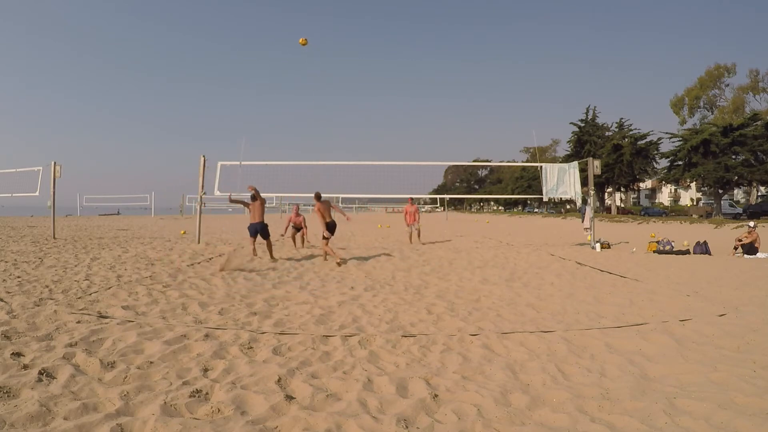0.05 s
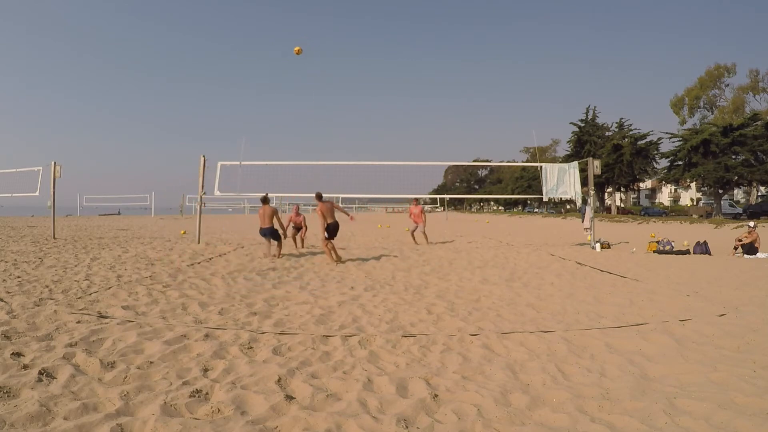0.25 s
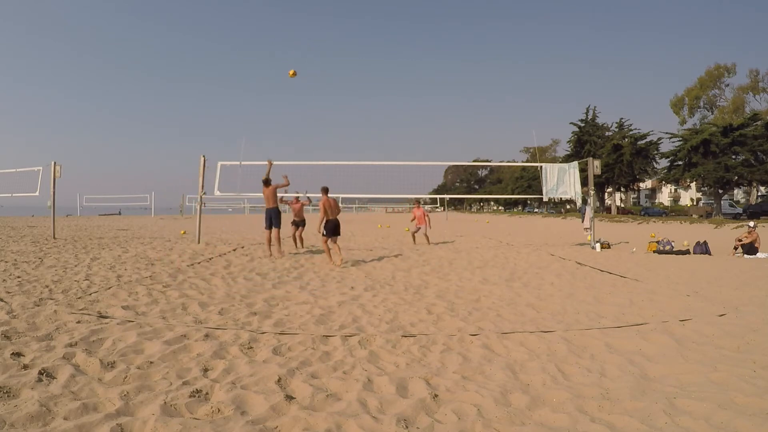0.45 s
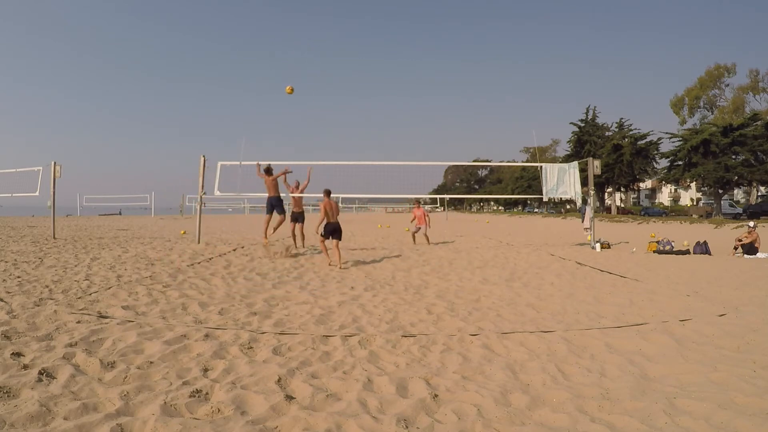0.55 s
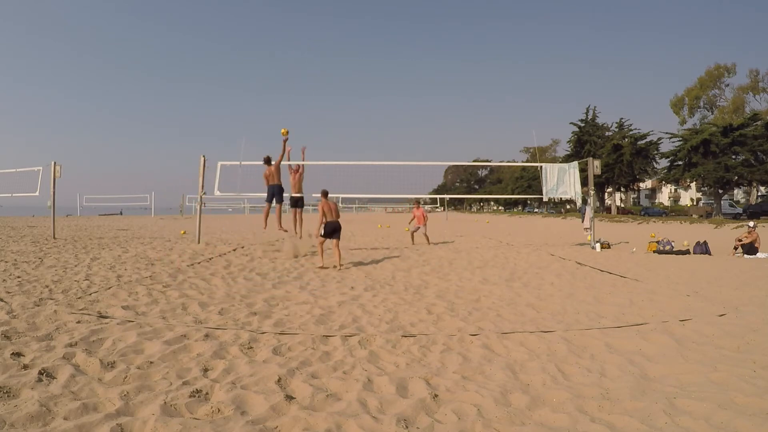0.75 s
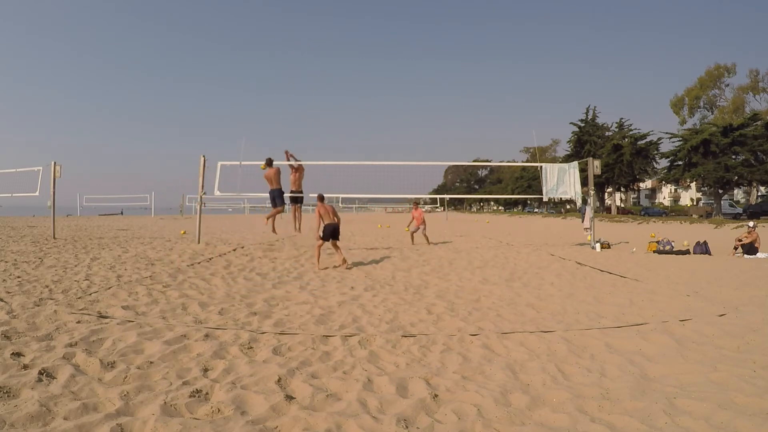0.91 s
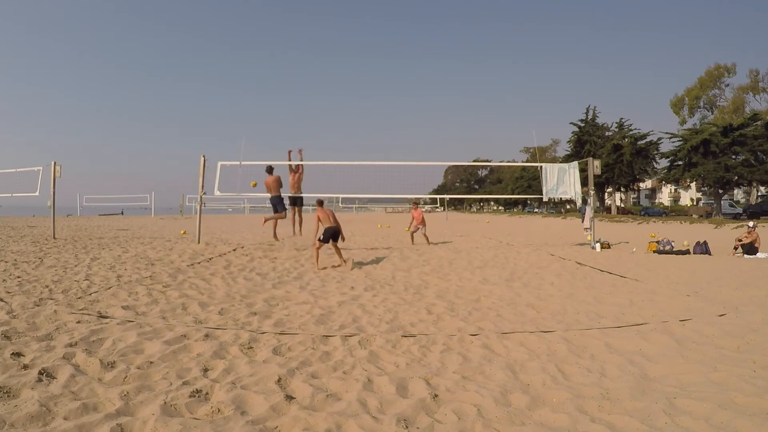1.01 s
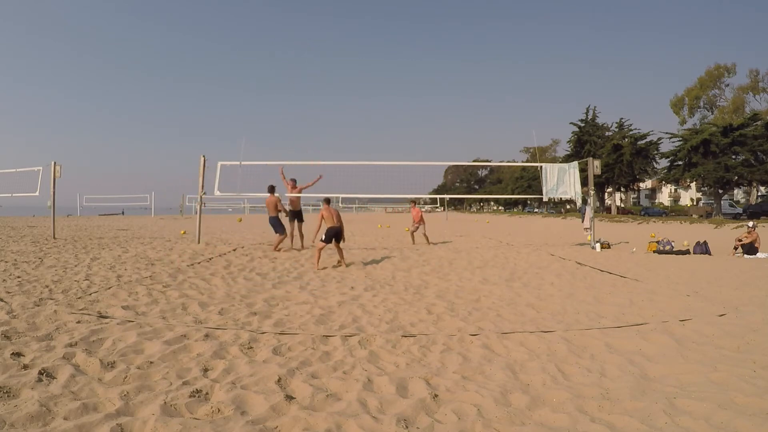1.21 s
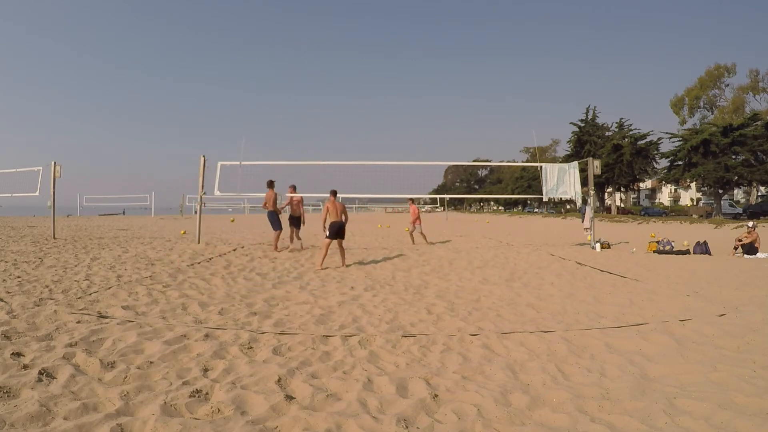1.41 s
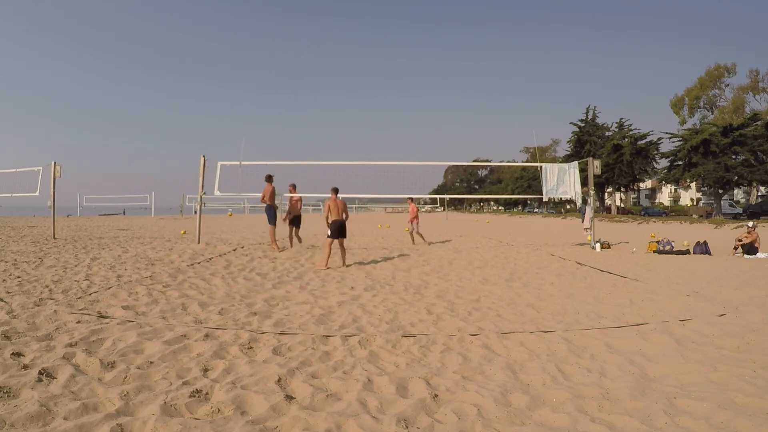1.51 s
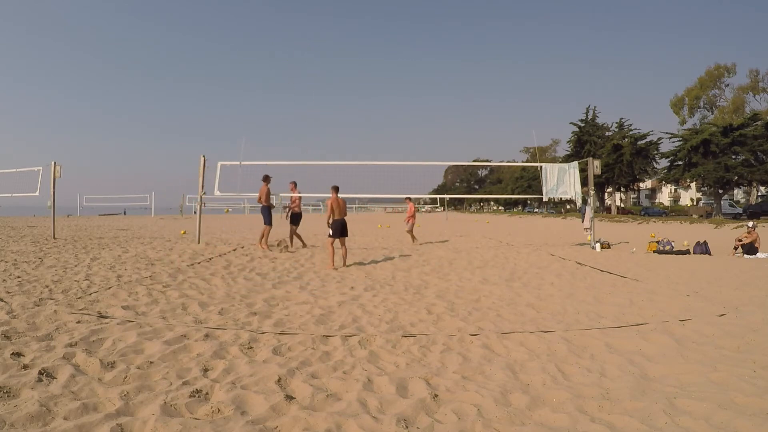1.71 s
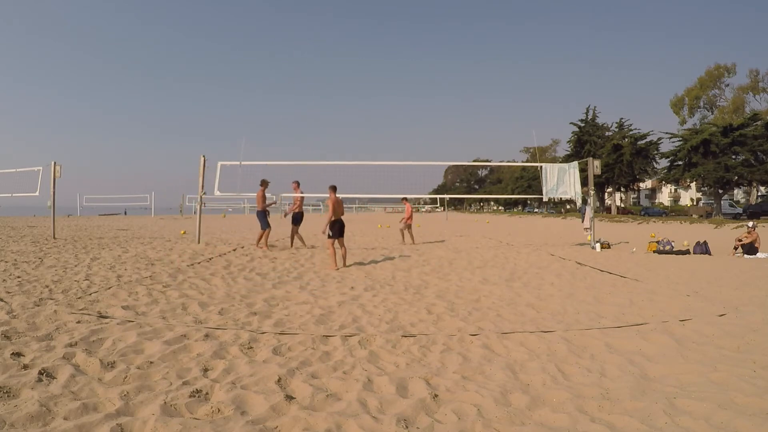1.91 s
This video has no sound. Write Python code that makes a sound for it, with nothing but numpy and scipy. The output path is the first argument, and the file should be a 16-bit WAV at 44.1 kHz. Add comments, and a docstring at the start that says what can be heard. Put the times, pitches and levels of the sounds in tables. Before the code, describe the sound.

A hand strikes a volleyball once at about 0.9 seconds, a sharp slap with a low thump and a very short tail. Wind buffets the microphone with a low, wavering rumble from 0.2 to 0.5 seconds and again from 1.3 to 1.7. Distant surf hisses faintly throughout. Soft steps in sand come before the hit and around 1.3 seconds, with faint, far chirps scattered behind.

```python
"""A breeze rumbles over distant surf, soft steps in the sand and faint chirps: beach volleyball.
Two gusts buffet the microphone with a low, wavering drone. Between them comes one sharp slap:
fingers and palm strike the ball, squeezing out a crack of air and exciting the modes of its skin.
The ball thumps, the air inside rings briefly, and sand and players scatter the sound."""
import sys
import numpy as np
from scipy import signal
from scipy.fft import rfft, irfft
from scipy.io import wavfile
from scipy.ndimage import uniform_filter1d

SR = 44100
rng = np.random.default_rng(int(sys.argv[2]) if len(sys.argv) > 2 else 0)


def log_audio(samples):
    """Write samples as a 16-bit WAV file to the path given in sys.argv[1]."""
    # one column per channel
    frames = np.atleast_2d(samples).T
    # limit to full scale, then quantise
    limited = np.clip(frames, -1, 1)
    pcm = np.round(limited * 32767).astype(np.int16)
    wavfile.write(sys.argv[1], SR, pcm)


N = 85995
T = np.arange(N) / SR
HIT_S = .8991


def from_db(db):
    """Amplitude grows tenfold for every 20 dB."""
    return 10 ** (np.asarray(db) / 20)


def rms_one(x):
    """Division by the rms gives a signal unit power."""
    return x / np.sqrt(np.mean(x ** 2) + 1e-20)


def in_time(rows):
    """Linear interpolation joins (seconds, value) points into a curve."""
    return np.interp(T, *np.transpose(rows))


def noise(spectrum):
    """Spectral shaping turns white noise into coloured noise of unit rms."""
    hz, db = np.transpose(spectrum)
    bins = np.maximum(np.fft.rfftfreq(N, 1 / SR), 1)
    gain = from_db(np.interp(np.log(bins), np.log(hz), db)) * np.minimum(bins / 20, 1) ** 2
    return rms_one(irfft(rfft(rng.standard_normal(N)) * gain, N))


def drift(rate_hz):
    """Low-pass filtered noise wanders about zero with unit spread."""
    bins = np.fft.rfftfreq(N, 1 / SR)
    gain = (bins > 0) / (1 + (bins / rate_hz) ** 2) ** 2
    return rms_one(irfft(rfft(rng.standard_normal(N)) * gain, N))


def swells(rows):
    """Gaussian bumps add up to an envelope; each width is a standard deviation."""
    return sum(from_db(db) * np.exp(-.5 * ((T - at) / width) ** 2) for at, db, width in rows)


def touch(at, length):
    """A force pulse of unit area: the shorter the contact, the wider its spectrum."""
    pulse = np.exp(-2 * ((T - at) / length) ** 2)
    return pulse / (pulse.sum() + 1e-20)


def ring(force, modes):
    """Modal superposition: a force drives damped resonators, neighbours in opposite sign."""
    response = 0
    for k, (hz, db, t60) in enumerate(modes):
        radius = np.exp(-np.log(1000) / (t60 * SR))
        angle = 2 * np.pi * hz / SR
        feedback = [1, -2 * radius * np.cos(angle), radius ** 2]
        mode = signal.lfilter([0, np.sin(angle)], feedback, force + 1e-18)
        response += (-1) ** k * from_db(db) * mode
    return response


def burst(attack_s, hold_s, t60_s):
    """An envelope rises linearly from the hit and decays exponentially after the hold."""
    age = T - HIT_S
    return np.clip(age / attack_s, 0, 1) * np.exp(-np.log(1000) * np.maximum(age - hold_s, 0) / t60_s)


def wind():
    """Pressure fluctuations of gusts at the microphone make a wavering drone and a rumble."""
    # Each row: time in seconds, relative level in dB.
    drone_levels = [(0, -49), (.05, -61), (.17, -67), (.22, -36), (.29, -27.5), (.385, -30), (.42, -38),
                    (.48, -35), (.51, -47), (.67, -54.5), (.8, -45), (.85, -67), (1.02, -58), (1.08, -54),
                    (1.285, -52.5), (1.315, -32.5), (1.36, -59), (1.4, -39.5), (1.435, -41.5), (1.465, -31),
                    (1.51, -45.5), (1.57, -41), (1.595, -54), (1.64, -34.5), (1.75, -52), (1.9, -59),
                    (1.95, -49)]
    rumble_levels = [(0, -47), (.19, -54), (.25, -37.5), (.3, -40.5), (.36, -35.5), (.42, -42),
                     (.52, -49.5), (.66, -53.5), (.85, -62), (1.0, -57), (1.29, -49), (1.32, -36),
                     (1.38, -33.5), (1.43, -42), (1.57, -44), (1.62, -51), (1.8, -68), (1.95, -52)]
    # Each row: frequency in Hz, relative spectral density in dB.
    rumble_spectrum = [(20, -13), (32, -3), (44, 8.5), (58, 4), (75, -8.5), (100, -28), (135, -22),
                       (180, -38), (400, -55), (900, -72), (6000, -115)]
    drone_hz = 81.65 + 1.5 * drift(rate_hz=17.9)
    drone_db = in_time(drone_levels) - 1 - 0.5 * drift(rate_hz=30)
    phase = 2 * np.pi * np.cumsum(drone_hz) / SR
    drone = np.sqrt(2) * np.sin(phase) * from_db(drone_db)
    eddies = noise(rumble_spectrum)
    local_power = uniform_filter1d(np.abs(signal.hilbert(eddies)) ** 2 / 2, size=3000)
    even_eddies = eddies / np.sqrt(local_power + 1e-9)  # the level curve alone shapes the gusts
    return drone + from_db(in_time(rumble_levels)) * even_eddies


def surf():
    """Distant waves add incoherently into steady noise."""
    # Each row: frequency in Hz, relative spectral density in dB.
    surf_spectrum = [(25, 21.5), (40, 23), (60, 17.5), (85, 22), (120, 17.5), (170, 15.5), (240, 5.5),
                     (340, 0.5), (480, 0), (750, -3.5), (1200, -5), (1750, -8), (2400, -8), (3300, -10),
                     (4800, -11), (7000, -15.5), (10000, -18), (14500, -20.5)]
    return from_db(-52) * noise(surf_spectrum)


def footsteps():
    """Sand thuds under compression and hisses with friction as feet sink and scuff."""
    # Each row: peak time in seconds, level in dB, width in seconds.
    steps = [(.02, -63, .03), (.2, -63, 0.054), (.368, -57.5, 0.018), (.55, -71, 0.036),
             (1.32, -62.5, 0.022)]
    scuffs = [(1.053, -74, .04), (1.345, -68, 0.032)]
    # Each row: frequency in Hz, relative spectral density in dB.
    step_spectrum = [(100, 6.5), (190, 2.5), (300, -1.5), (500, 5), (800, -8.5), (1400, -8.5), (2500, -26),
                     (5000, -37), (10000, -53)]
    scuff_spectrum = [(300, 0), (1000, -22), (2200, -10), (3400, -2), (4400, 1), (8000, -17), (15000, -30)]
    return swells(steps) * noise(step_spectrum) + swells(scuffs) * noise(scuff_spectrum)


def chirps(bandwidth_hz=420):
    """Narrow-band noise has a breathy pitch; short swells of it make faint, far chirps."""
    # Each row: peak time in seconds, level in dB, width in seconds, centre frequency in Hz.
    calls = [(0.225, -70.5, 0.059, 2160), (0.383, -69, 0.036, 2250), (.45, -72, 0.051, 2300),
             (1.05, -73, 0.031, 3280), (1.072, -71.5, 0.1, 2110), (1.346, -71.5, 0.1, 2290),
             (1.596, -73.5, .025, 2890), (1.575, -72, .02, 2340), (1.65, -68.5, 0.038, 2270)]
    sound = np.zeros(N)
    for at, db, width, hz in calls:
        edges = [hz - bandwidth_hz / 2, hz + bandwidth_hz / 2]
        band = signal.butter(2, edges, "band", fs=SR, output="sos")
        breath = rms_one(signal.sosfilt(band, rng.standard_normal(N)))
        sound += swells([(at, db, width)]) * breath
    return sound


def slap():
    """Impact excites the modes of the ball's skin and expels a crack of air from under the palm."""
    # The hand lands in parts. Each row: delay in seconds, relative level in dB, length in seconds.
    contacts = [(.00015, -1, .00009), (.0008, -3, .00003), (.00165, -8, .00006)]
    # Each row: frequency in Hz, relative level in dB, time to decay by 60 dB in seconds.
    skin_modes = [(960, -17, 0.18), (1250, -10, 0.013), (1780, -22, 0.041), (2350, -1, 0.042),
                  (2960, -7, 0.019), (3780, -5, 0.015), (4230, -4.5, 0.021), (4736, 5.5, 0.0079),
                  (5110, -1, 0.016), (6000, -3, 0.0093), (7615, -5, 0.019), (10530, -1.5, .007),
                  (12400, -22, 0.0071), (14000, 3, .008)]
    # Each row: frequency in Hz, relative spectral density in dB.
    crack_spectrum = [(500, -23), (1500, -5.5), (2500, -2), (4700, 6.5), (6500, -4), (10500, -9),
                      (15000, -21.5)]
    force = sum(from_db(db) * touch(HIT_S + delay, length) for delay, db, length in contacts)
    skin = from_db(-39) * ring(force, skin_modes)
    crack = from_db(-37) * noise(crack_spectrum) * burst(attack_s=.00036, hold_s=.0013, t60_s=.0038)
    return skin + crack


def scatter():
    """Scattering by sand and players follows the slap with diffuse noise and a fainter tail."""
    # Each row: frequency in Hz, relative spectral density in dB.
    scatter_spectrum = [(200, 3.5), (450, 8.5), (800, -4.5), (1500, -0.5), (2700, 3.5), (5000, -5.5),
                        (7000, -17.5), (15000, -24)]
    early = from_db(-45) * burst(attack_s=.00053, hold_s=.0053, t60_s=.03)
    tail = from_db(-58.5) * burst(attack_s=.011, hold_s=.0091, t60_s=.17)
    return (early + tail) * noise(scatter_spectrum)


def ball(thump_hz=104, thump_s=.0157):
    """Elastic flattening and rebound make one low thump; the enclosed air rings as a cavity."""
    # Soft pushes on the air inside. Each row: delay in seconds, relative level in dB.
    pushes = [(.002, 0), (.0117, -6.5)]
    # One row: frequency in Hz, relative level in dB, time to decay by 60 dB in seconds.
    cavity_mode = [(438, -30, .018)]
    age = T - HIT_S - .0005
    squeeze = np.sqrt(np.maximum(np.sin(np.pi * np.clip(age / thump_s, 0, 1)), 0))
    thump = from_db(-31) * squeeze * np.sin(2 * np.pi * thump_hz * age)
    force = sum(from_db(db) * touch(HIT_S + delay, length=.0004) for delay, db in pushes)
    return -thump - ring(force, cavity_mode)


def scene():
    """Superposition: the pressures of the hit and its surroundings add at one microphone."""
    hit = slap() + scatter() + ball()
    return (hit + wind() + footsteps() + surf() + chirps())[None]


def record(dry, cutoff_hz=15300):
    """An elliptic low-pass filter cuts the highest treble steeply."""
    return signal.sosfilt(signal.ellip(12, .1, 80, cutoff_hz, fs=SR, output="sos"), dry)


dry = scene()
out = record(dry)
log_audio(out)
```